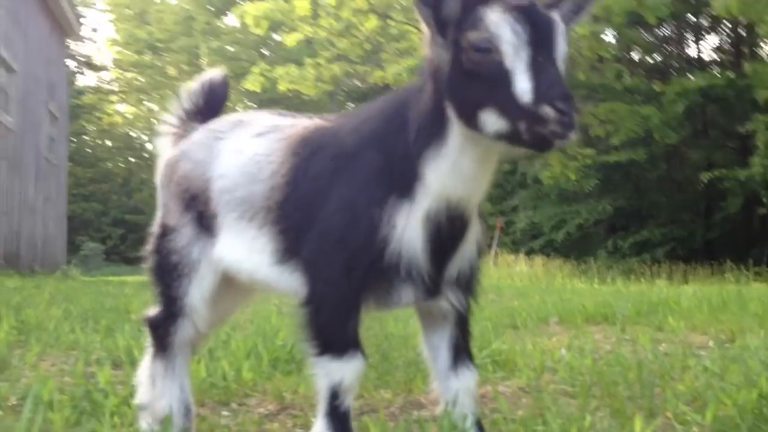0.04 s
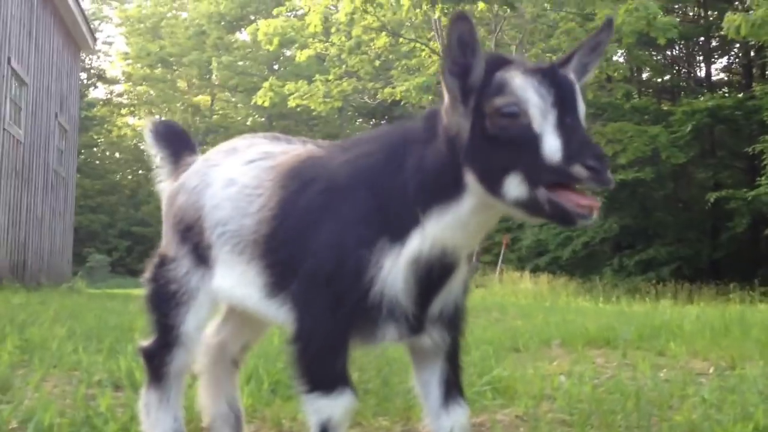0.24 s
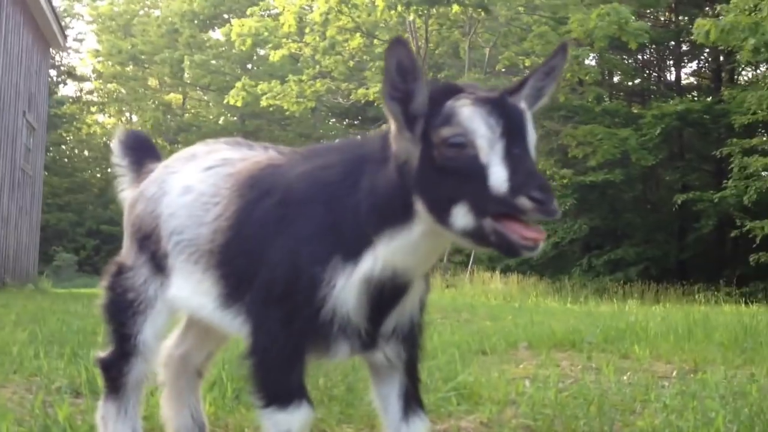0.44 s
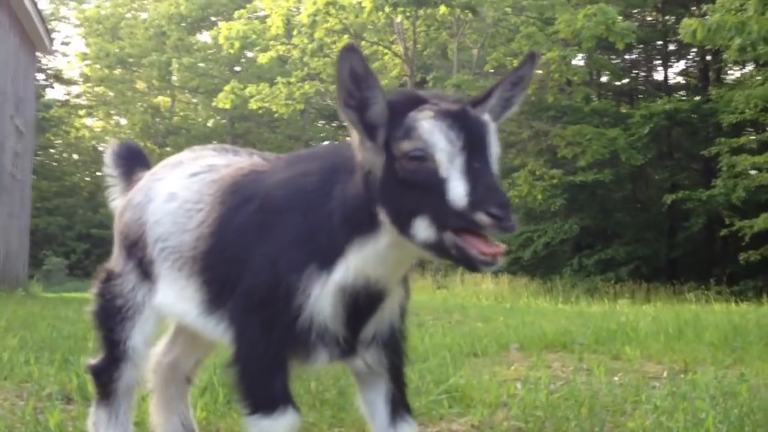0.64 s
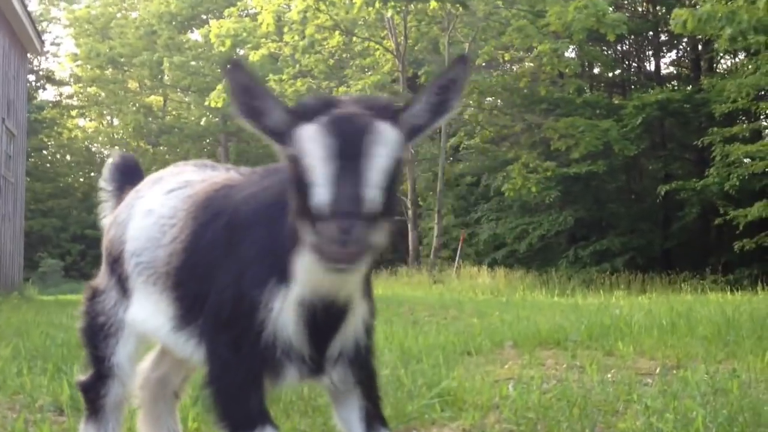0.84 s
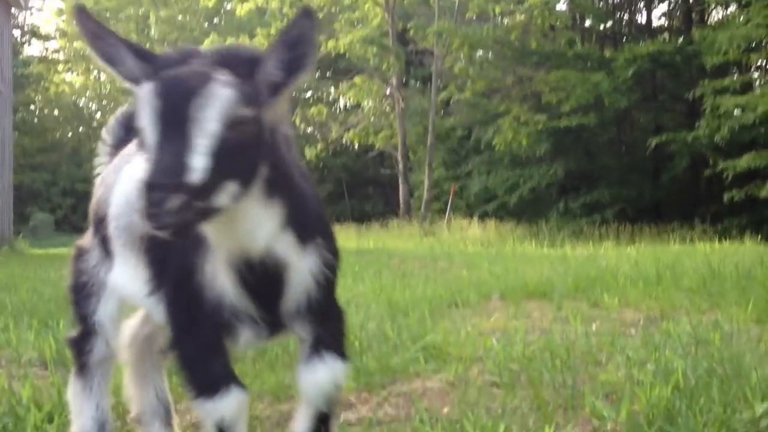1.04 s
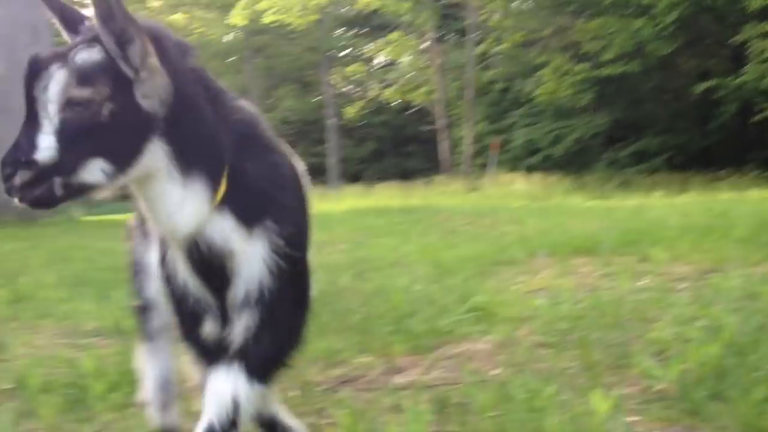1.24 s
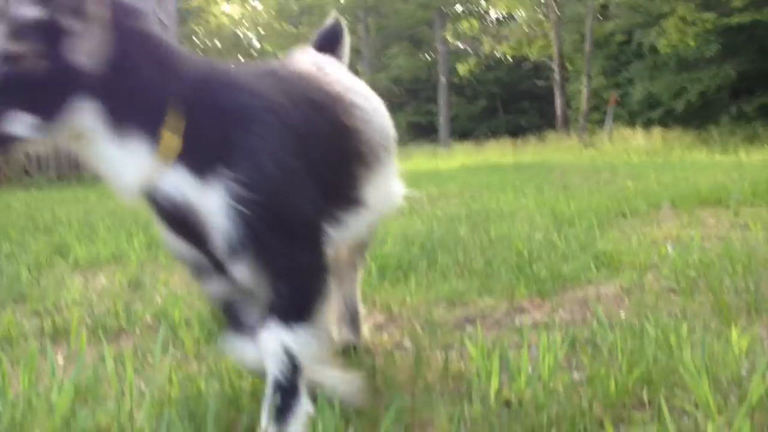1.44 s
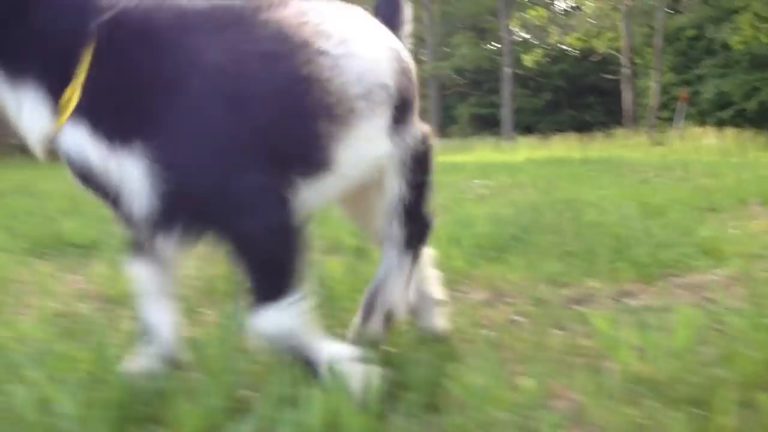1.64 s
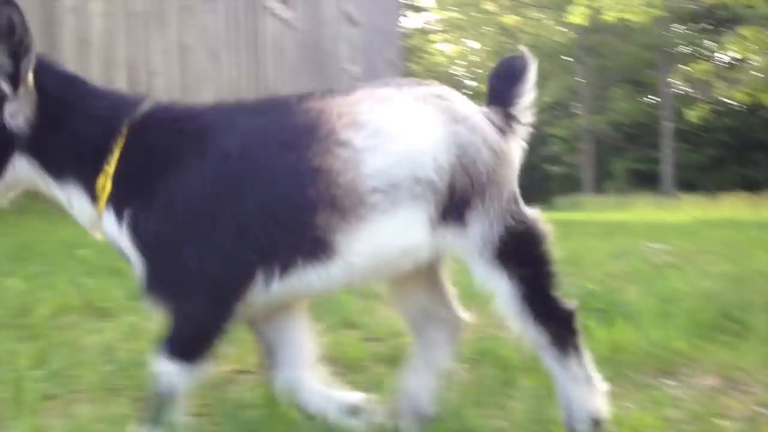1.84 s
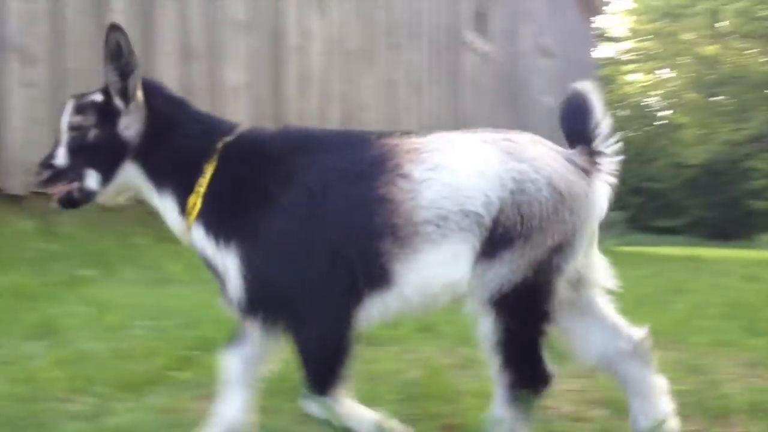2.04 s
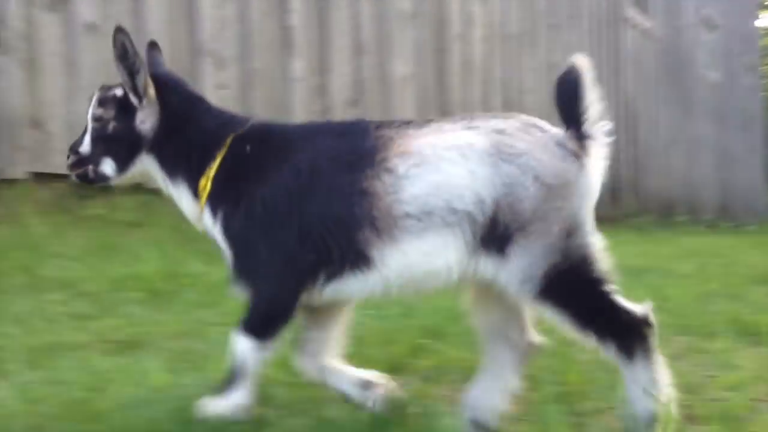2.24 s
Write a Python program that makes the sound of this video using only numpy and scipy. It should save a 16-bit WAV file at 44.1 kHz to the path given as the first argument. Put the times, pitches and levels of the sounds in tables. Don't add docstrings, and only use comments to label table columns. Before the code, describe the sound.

A young goat close to the microphone gives a bright, stuttering bleat of six pulses, gulps softly, pauses, then bleats again with four duller pulses, over quiet outdoor hush and soft wind bumps.

```python
import sys
import numpy as np
from scipy import signal
from scipy.fft import rfft, irfft
from scipy.io import wavfile

SR = 44100
rng = np.random.default_rng(int(sys.argv[2]) if len(sys.argv) > 2 else 0)


def attenuation_scalar(level_db):
    decades = np.asarray(level_db, float) / 20
    return 10 ** decades


def dump_mix(stems):
    frames = np.atleast_2d(stems).T
    limited = np.clip(frames, -1, 1)
    pcm = np.round(limited * 32767).astype(np.int16)
    wavfile.write(sys.argv[1], SR, pcm)


N = 101429


def t_s():
    return np.arange(N) / SR


def rms_one(x):
    return x / np.sqrt(np.mean(x ** 2) + 1e-20)


def drift(rate_hz):
    r = np.exp(-2 * np.pi * rate_hz / SR)
    settle = 9000
    noise = rng.standard_normal(N + settle)
    return rms_one(signal.lfilter([1], [1, -2 * r, r * r], noise)[settle:])


def ramp(s, start_s, length_s):
    progress = np.clip((s - start_s) / max(length_s, 1e-4), 0, 1)
    return np.sin(np.pi / 2 * progress) ** 2


def hush(gust_db):
    # freq_hz, level_db
    spectrum = np.array([(30, -34.5), (230, -2), (550, -6.5), (1900, -18.5), (5000, -25.5), (9000, -30),
                         (11000, -43.5), (14000, -26.5)])
    level_db, rustle_follows = -69, 0.31
    edges = np.minimum(24 * 2 ** np.arange(0, 9.9, .5), 16000)
    white = rng.standard_normal((2, N))
    out = 0
    for k, (low, high) in enumerate(zip(edges, edges[1:])):
        hz = np.sqrt(low * high)
        db = np.interp(np.log(hz), np.log(spectrum[:, 0]), spectrum[:, 1])
        db = db + 2.7 * drift(5.6)
        db = db + rustle_follows * (gust_db - gust_db.mean()) / (1 + hz / 2000)
        band = signal.butter(2, [low, high], "band", fs=SR, output="sos")
        out = out + attenuation_scalar(db) * signal.sosfilt(band, white[k % 2])
    return attenuation_scalar(level_db) * rms_one(out)


def wind(gust_db):
    band = signal.butter(2, [127.3, 241], "band", fs=SR, output="sos")
    rumble = signal.sosfilt(band, rng.standard_normal(N))
    lumps = attenuation_scalar(1.5 * drift(22))
    return attenuation_scalar(gust_db - 3.5) * rms_one(lumps * rumble)


def far_calls():
    # start_s, length_s, level_db, pitch_hz
    calls = [
        (0.014, 0.19, -82, 870),
        (0.832, 0.092, -83, 1454),
        (.93, .1, -78, 545),
        (2.204, 0.087, -78.5, 1158),
        (2.23, 0.11, -81, 922),
    ]
    s, out = t_s(), 0
    for start, length, db, hz in calls:
        level = attenuation_scalar(db + 5 + 0.83 * drift(27))
        shape = ramp(s, start, 0.0079) * (1 - ramp(s, start + length - .02, 0.026))
        phase = 2 * np.pi * np.cumsum(hz * (1 + 0.0136 * drift(19.4))) / SR
        out = out + level * shape * np.sin(phase)
    return out


def yard(x):
    first_echo_s, echo_db, t60_s = .008, -22, .14
    s = np.arange(SR // 4) / SR
    tail = rng.standard_normal(len(s)) * attenuation_scalar(-60 * s / t60_s) * (s > first_echo_s)
    tail = tail / np.sqrt(np.sum(tail ** 2))
    return attenuation_scalar(echo_db) * signal.fftconvolve(x, tail)[:N]


def gulps():
    # start_s, length_s, level_db, freq_hz
    rings = [
        (.754, .02, -57, 950),
        (.757, .012, -58, 650),
        (.760, .025, -54, 430),
        (1.615, .015, -66, 500),
        (2.016, .016, -47, 415),
        (2.020, .012, -58, 720),
        (2.022, .024, -62, 2150),
        (2.035, .01, -52, 500),
        (2.116, .012, -60, 160),
    ]
    s, out = t_s(), 0
    for start, length, db, hz in rings:
        shape = ramp(s, start - .004, 0.004) * (1 - ramp(s, start + 0.49 * length, length))
        level = attenuation_scalar(db + 3 + 2.5 * drift(60))
        phase = 2 * np.pi * np.cumsum(hz * (1 + .06 * drift(140))) / SR
        out = out + level * shape * np.sin(phase)
    return out


def tract(x, peaks, dips):
    size, mouth_top_hz = 4096, 7150
    hz = np.arange(size // 2 + 1) * SR / size + 1
    power, dip_log = 0, 0
    for f, width, db in peaks:
        mouth_end = 1 + (f < 8000) * (hz / mouth_top_hz) ** 40
        power = power + attenuation_scalar(db) ** 2 / (1 + (2 * (hz - f) / width) ** 2) ** 2 / mouth_end
    for f, width, db in dips:
        dip_log = dip_log + np.log(attenuation_scalar(db)) * np.exp(-(2 * (hz - f) / width) ** 2)
    cep = irfft(np.log(power) / 2 + dip_log)
    cep[1:size // 2] *= 2
    cep[size // 2 + 1:] = 0
    return signal.fftconvolve(x, irfft(np.exp(rfft(cep))))[:N]


def harmonics(phase, first, last):
    return sum(np.cos(2 * np.pi * k * phase) for k in range(first, last + 1))


def bleat(beats, hoarse, peaks, dips, sag, leak_db):
    catch_s, break_s, break_hold_s, break_db = .033, .013, .012, -8.5
    lock_s, unlock_s, swell_db = .003, .004, -4
    catch_sag, break_sag, catch_over = .13, .12, .03
    s, clear, rough, knots = t_s(), np.zeros(N), np.zeros(N), []
    for start, length, db, hz, lead_db in beats:
        end = start + length
        lock = ramp(s, start - lock_s, lock_s) * (1 - ramp(s, end, unlock_s))
        arch = np.clip((s - start) / length / .7 - 1, -1.2, 1.2) ** 2
        clear += lock * attenuation_scalar(db + swell_db * arch)
        catch = ramp(s, start - catch_s, catch_s * .85) * (1 - ramp(s, start - lock_s, lock_s))
        rough += attenuation_scalar(db + lead_db) * catch
        fall_db = 20 * np.clip(s - end - break_hold_s, 0, 1) / break_s
        rough += attenuation_scalar(db + break_db - fall_db) * ramp(s, end, unlock_s)
        knots += [(start - catch_s, hz * (1 - catch_sag)), (start - .008, hz * (1 + catch_over))]
        knots += [(start, hz * (1 + sag)), (end, hz * (1 - sag)), (end + break_s, hz * (1 - break_sag))]
    for start, length, db, hz in hoarse:
        fade = 1 - ramp(s, start + length, .3 * length + .005)
        rough += attenuation_scalar(db) * ramp(s, start - .01, .013) * fade
        knots += [(start + length / 2, hz)]

    first, last = hoarse[0][0], hoarse[-1][0] + hoarse[-1][1]
    leak_level = attenuation_scalar(np.mean(beats, axis=0)[2] + leak_db)
    leak = leak_level * ramp(s, first, 0.014) * (1 - ramp(s, last, 0.053))

    unlocked = rough / (rough + 8 * clear + 1e-9)
    jitter = (.05 * unlocked + .003) * drift(70)
    pitch_hz = np.interp(s, *np.transpose(sorted(knots))) * (1 + jitter)
    phase = np.cumsum(pitch_hz) / SR
    pulses = -rms_one(harmonics(phase, 1, 18) + (unlocked < .5) * harmonics(phase, 19, 25))
    air = rng.standard_normal(N) * (1 + .6 * np.cos(2 * np.pi * phase))

    shimmer = attenuation_scalar(4 * np.clip(drift(100), -2, 1.3))
    slack = pulses * rough * shimmer + air * (rough * attenuation_scalar(-6) + leak)
    throat_hz, throat_width_hz = 1668, 85
    ring = signal.iirpeak(throat_hz, throat_hz / throat_width_hz, fs=SR)
    slack = slack + 0.43 * signal.lfilter(*ring, slack)
    slack = signal.lfilter(*signal.butter(1, 970, "high", fs=SR), slack)
    r = np.exp(-2 * np.pi * 2960 / SR)
    slack = signal.lfilter([1 - r], [1, -r], slack)

    above = signal.butter(8, 8000, "high", fs=SR, output="sos")
    top_air = attenuation_scalar(2) * signal.sosfilt(above, air * (rough + 2 * leak + .1 * clear))
    locked = clear * (pulses + air * attenuation_scalar(-23))
    return attenuation_scalar(19) * tract(top_air + locked + slack, peaks, dips)


def first_bleat():
    # start_s, length_s, level_db, pitch_hz, lead_in_db (re core)
    beats = [
        (.233, 0.015, -41.5, 604.2, -3.5),
        (.322, 0.017, -40, 600, -3),
        (.420, 0.016, -42, 600.6, 0.5),
        (.501, 0.027, -40, 610.7, -3.5),
        (.602, .024, -40.5, 617, -1),
        (.690, 0.03, -40.5, 620.2, -4.5),
    ]
    # start_s, length_s, level_db, pitch_hz
    hoarse = [
        (0.139, 0.0044, -67, 932.5),
        (0.149, 0.005, -63, 793),
        (0.16, 0.0085, -57.5, 864),
        (0.735, 0.022, -51.5, 578.3),
        (0.767, 0.0091, -58.5, 485),
    ]
    # freq_hz, width_hz, level_db
    peaks = [(600, 110, -20.5), (1250, 160, -7), (1716, 586, 1), (2970, 560, -14.5), (3934, 770, -9),
             (5120, 1010, -11), (5880, 430, -12), (6800, 1500, -14), (9260, 7700, -40)]
    # freq_hz, width_hz, depth_db
    dips = [(900, 200, -10), (3330, 220, -13), (4520, 180, -9), (8200, 400, -16)]
    return bleat(beats, hoarse, peaks, dips, sag=.001, leak_db=-23.5)


def second_bleat():
    # start_s, length_s, level_db, pitch_hz, lead_in_db (re core)
    beats = [
        (1.689, .030, -41.5, 576.8, -4),
        (1.777, 0.03, -43, 593.6, -7.5),
        (1.881, .025, -45, 608.4, 0),
        (1.976, 0.024, -45.5, 595.8, 0.5),
    ]
    # start_s, length_s, level_db, pitch_hz
    hoarse = [
        (1.614, 0.016, -54.5, 500),
        (1.639, 0.0061, -53, 550.5),
        (2.018, 0.0255, -74, 689.5),
    ]
    # freq_hz, width_hz, level_db
    peaks = [(615, 205, -10), (1672, 553, 0), (2850, 1270, -15), (3960, 210, -9), (4410, 1100, -11.5),
             (5310, 930, -11), (6350, 2400, -18), (11900, 10000, -49)]
    # freq_hz, width_hz, depth_db
    dips = [(1050, 500, -18), (3270, 420, -22), (8600, 1400, -25)]
    return bleat(beats, hoarse, peaks, dips, sag=.005, leak_db=-21)


def scene():
    # time_s, level_db
    gusts = [(0.0, -60.5), (0.33, -70), (0.36, -59.5), (0.38, -52), (0.58, -75.5), (0.6, -53.5),
             (0.82, -67.5), (1.07, -71), (1.09, -60), (1.17, -57.5), (1.2, -62), (1.25, -60), (1.41, -79),
             (1.79, -64.5), (1.91, -66.5), (2.13, -64), (2.16, -76), (2.3, -58)]
    gust_db = np.interp(t_s(), *np.transpose(gusts))
    goat = first_bleat() + second_bleat() + gulps()
    mix = hush(gust_db) + wind(gust_db) + far_calls() + yard(goat) + goat
    return mix[None]


def low_pass(x):
    return signal.sosfilt(signal.butter(12, 15220, fs=SR, output="sos"), x)


def record(dry):
    return low_pass(dry)


dry = scene()
out = record(dry)
dump_mix(out)
```